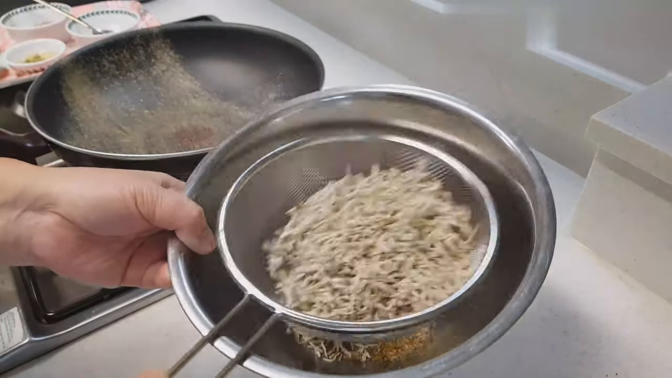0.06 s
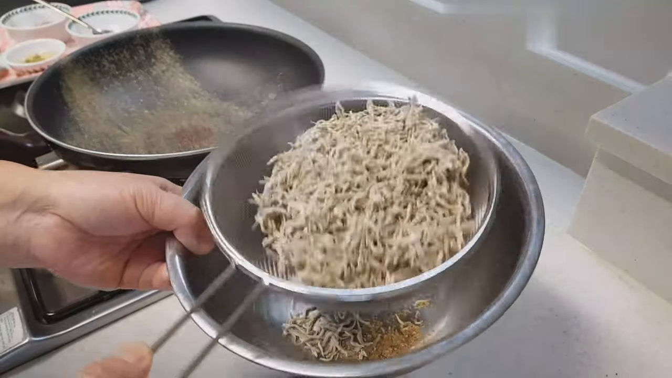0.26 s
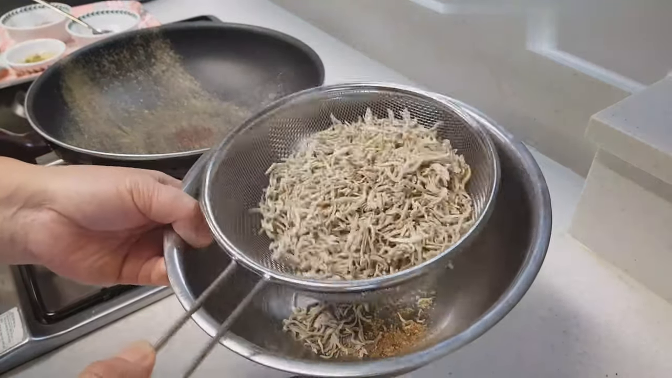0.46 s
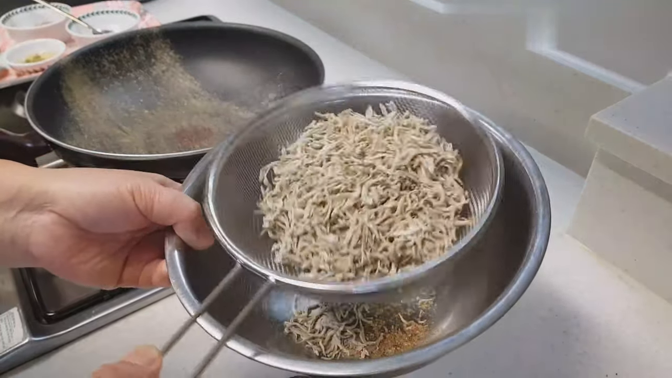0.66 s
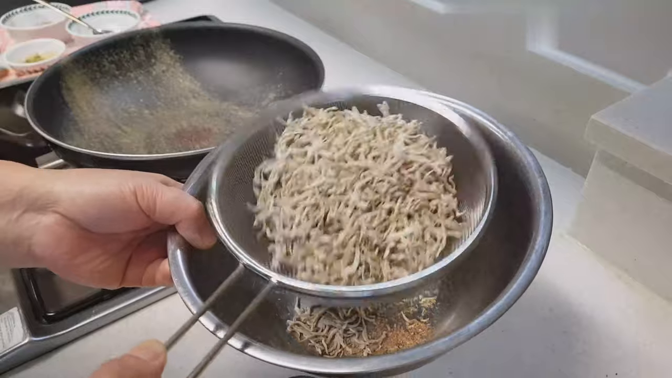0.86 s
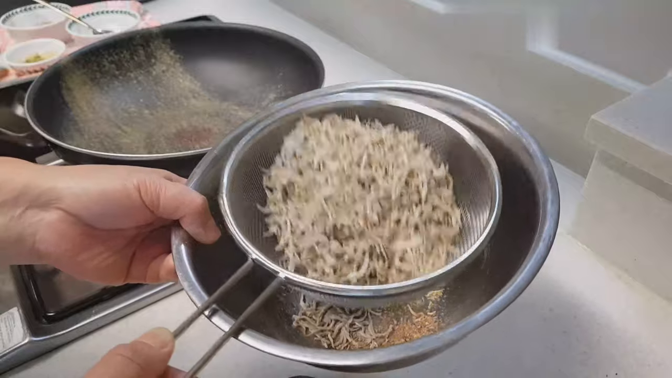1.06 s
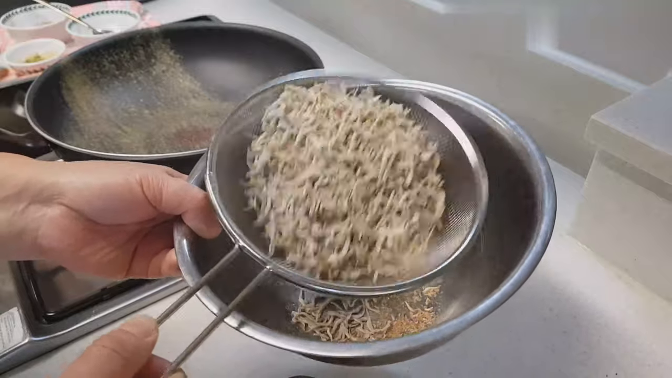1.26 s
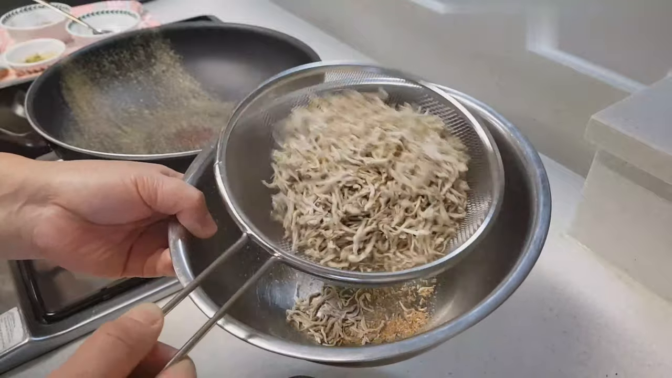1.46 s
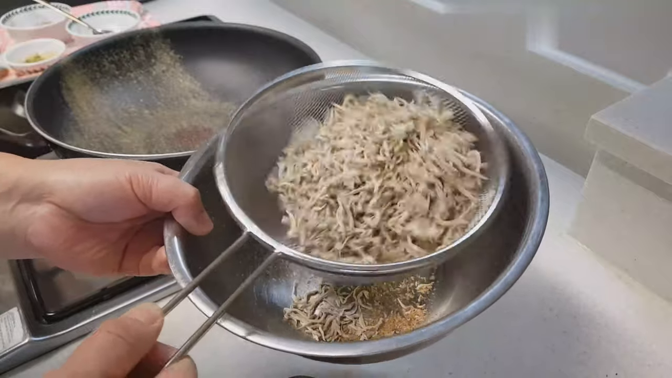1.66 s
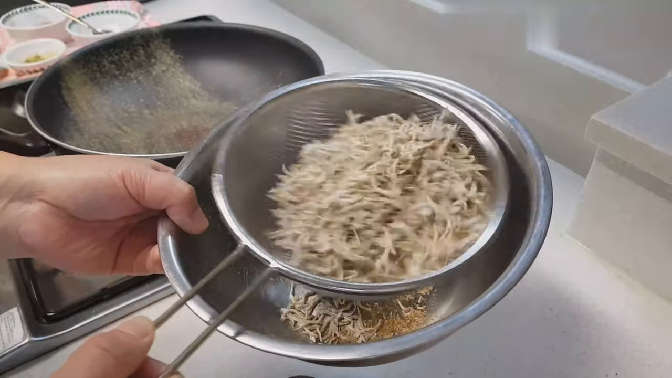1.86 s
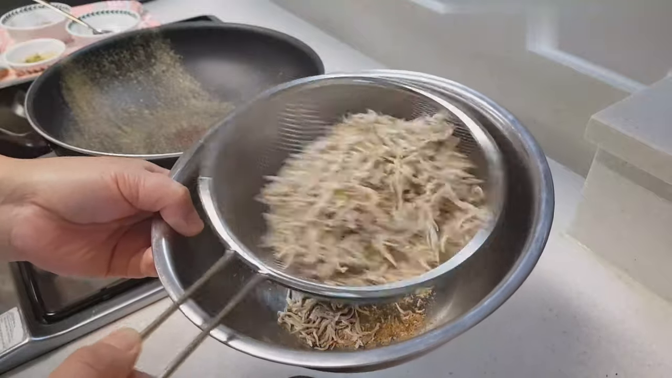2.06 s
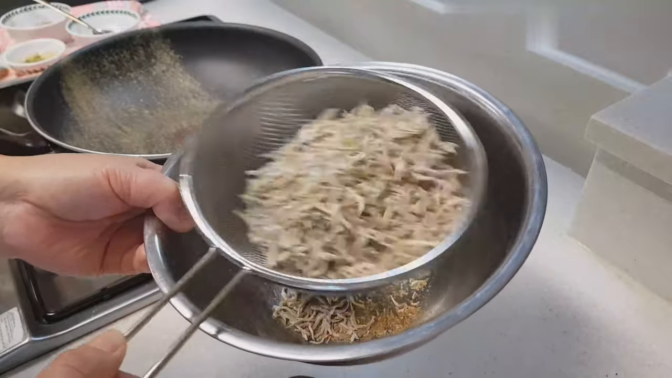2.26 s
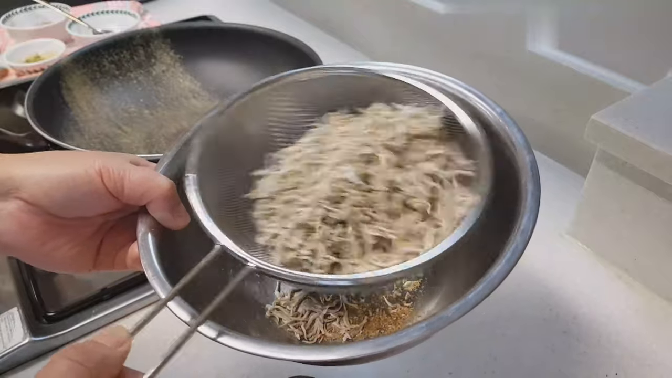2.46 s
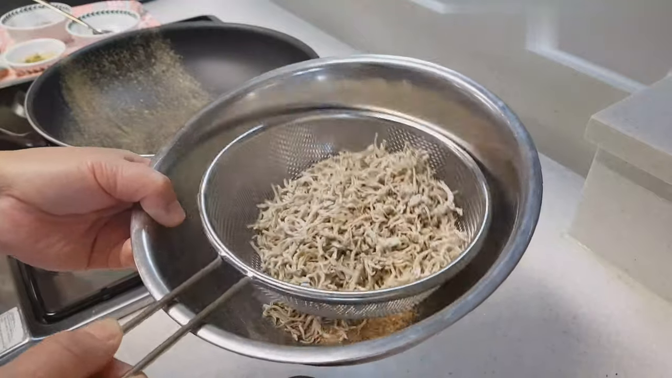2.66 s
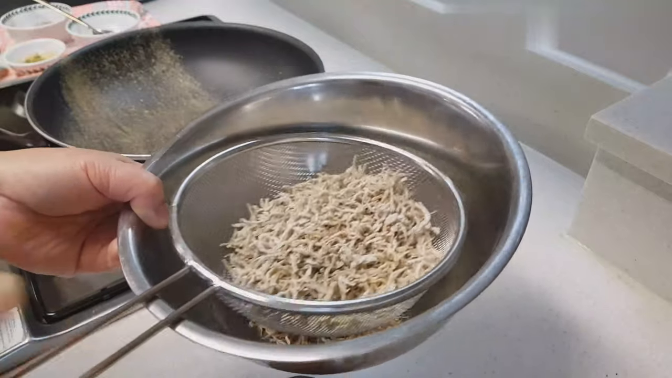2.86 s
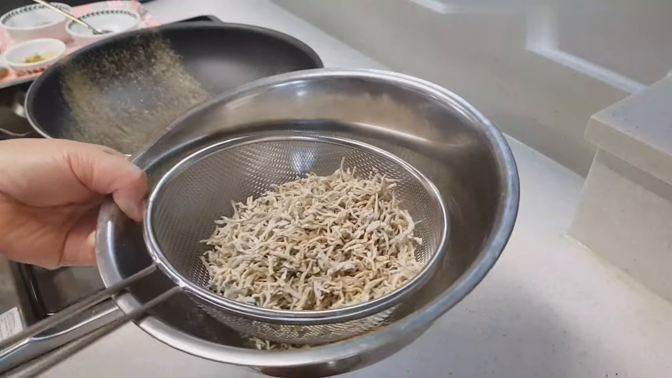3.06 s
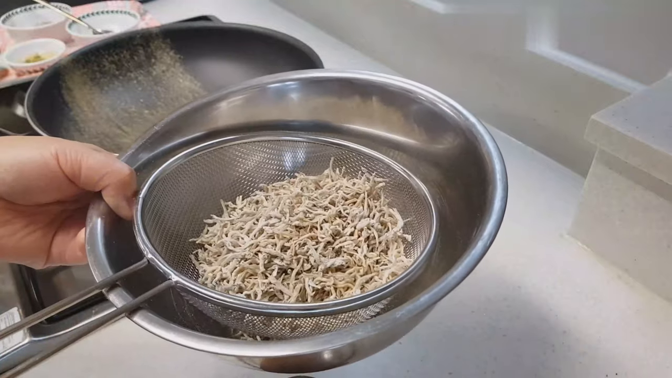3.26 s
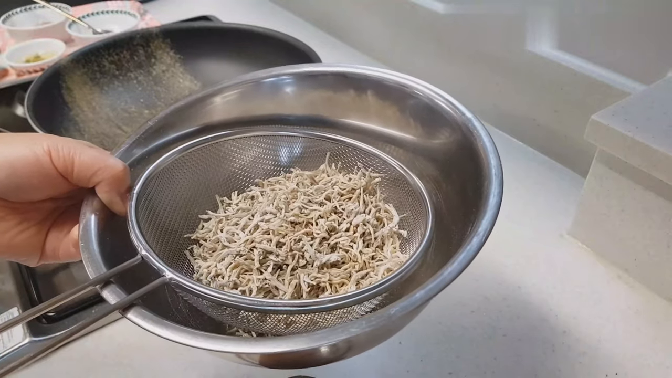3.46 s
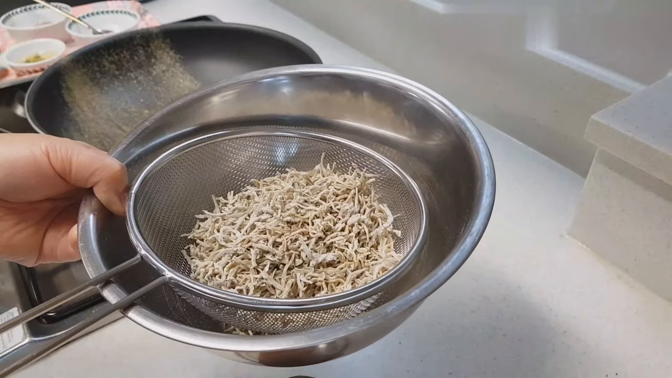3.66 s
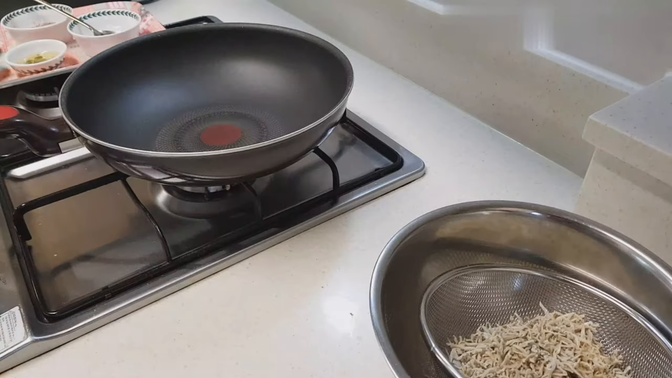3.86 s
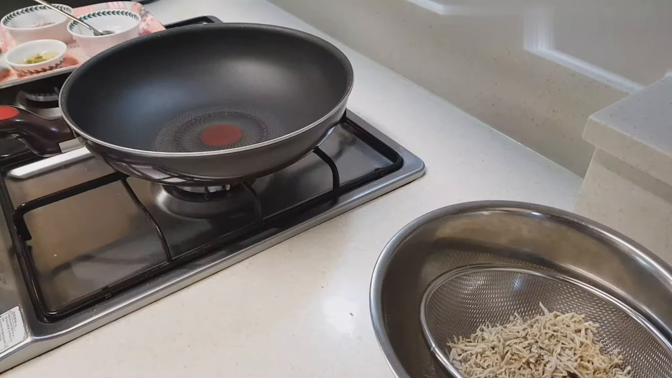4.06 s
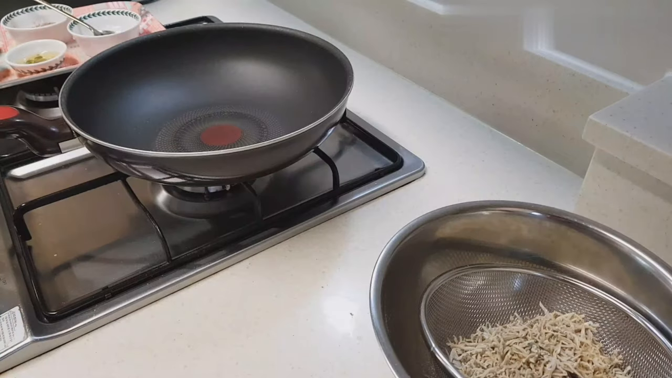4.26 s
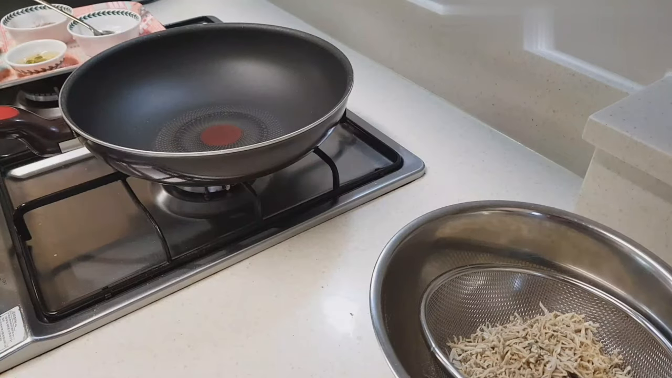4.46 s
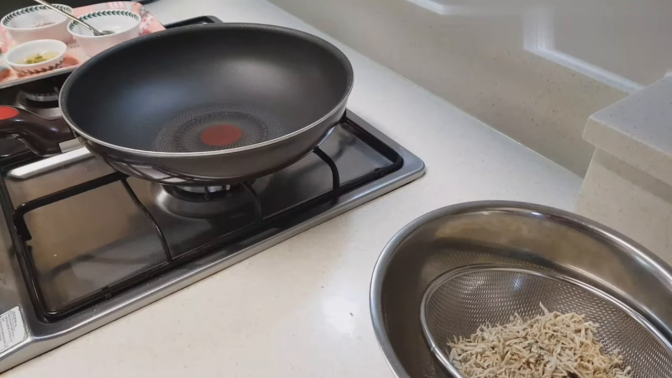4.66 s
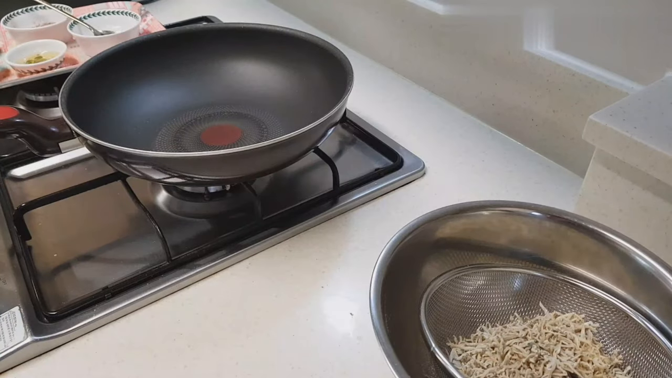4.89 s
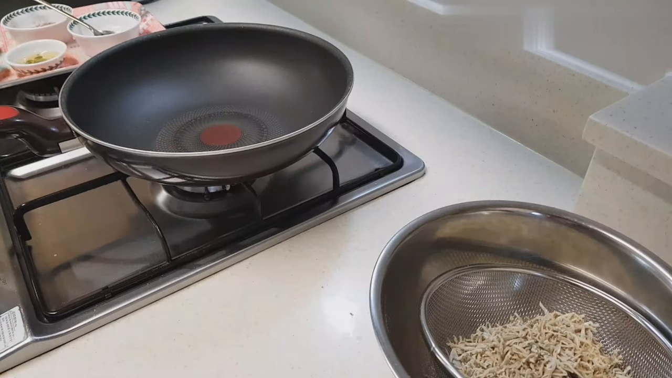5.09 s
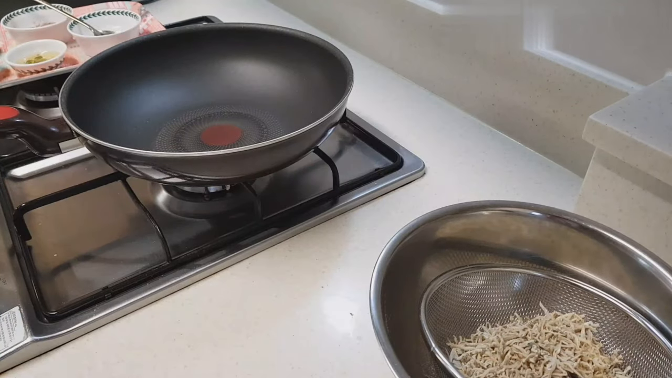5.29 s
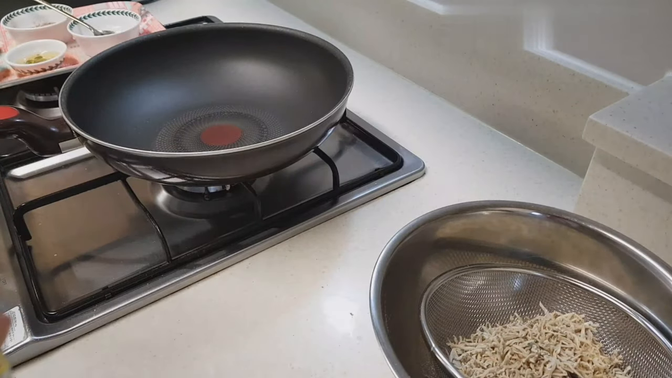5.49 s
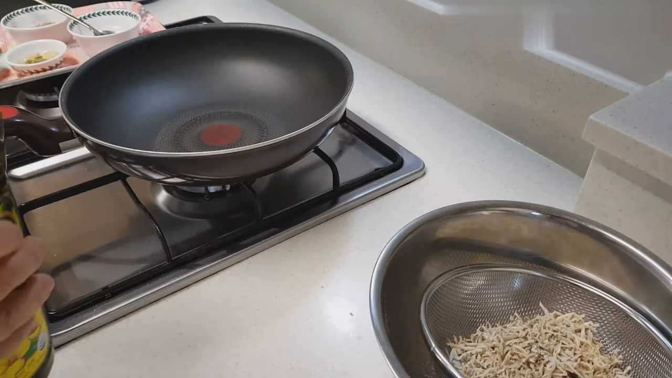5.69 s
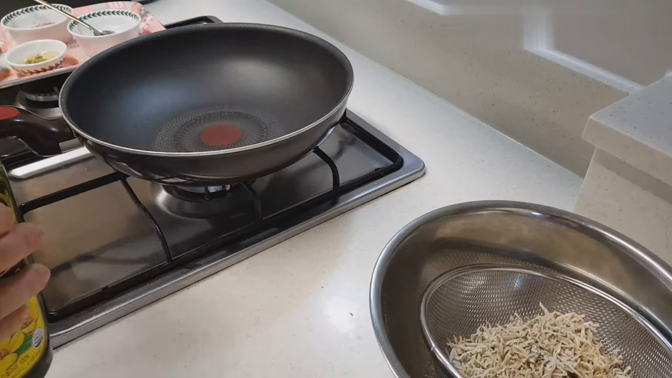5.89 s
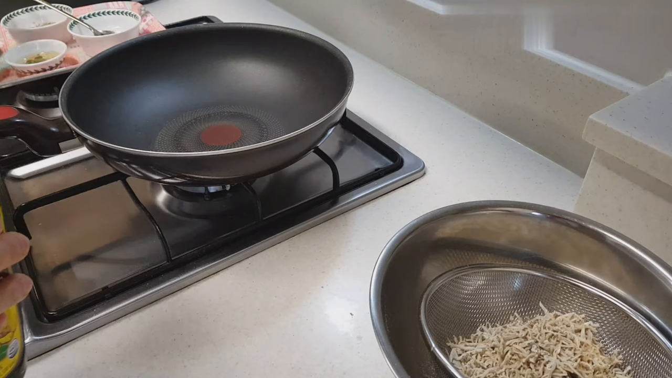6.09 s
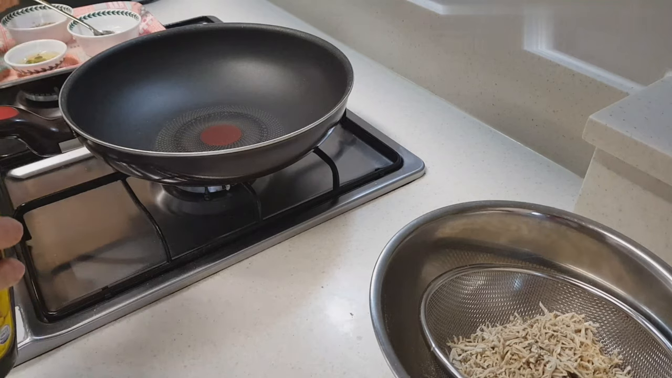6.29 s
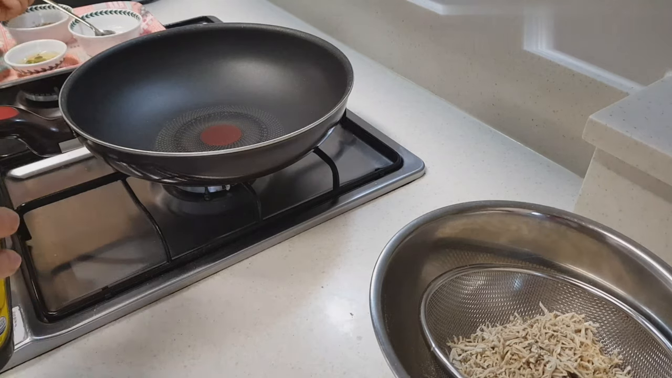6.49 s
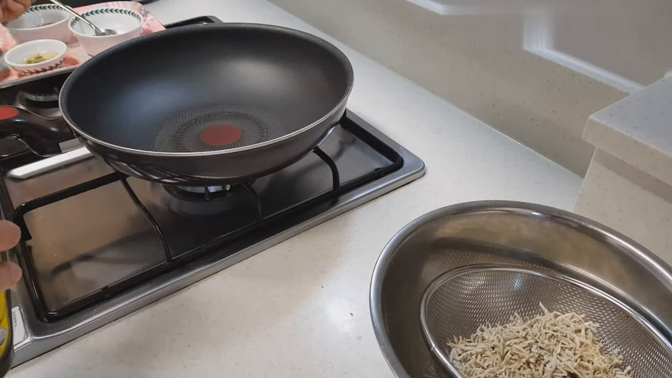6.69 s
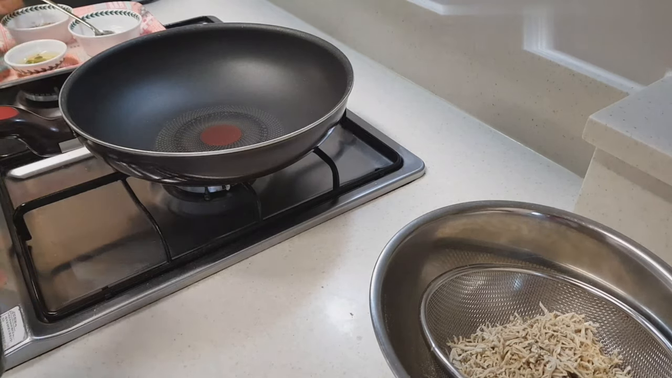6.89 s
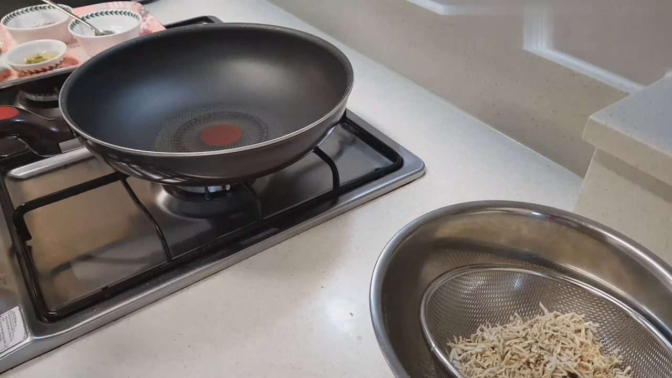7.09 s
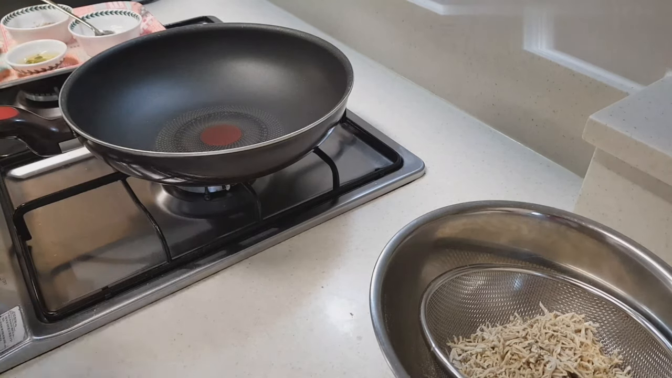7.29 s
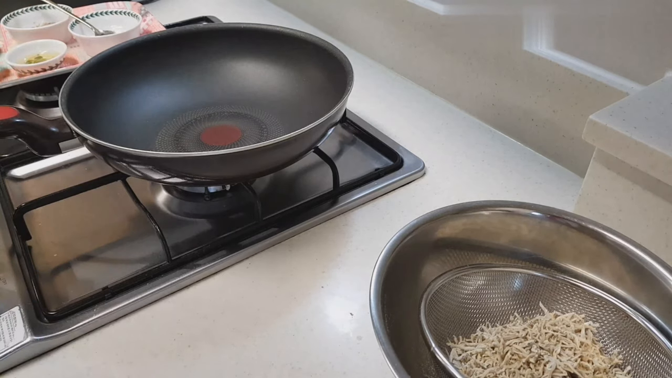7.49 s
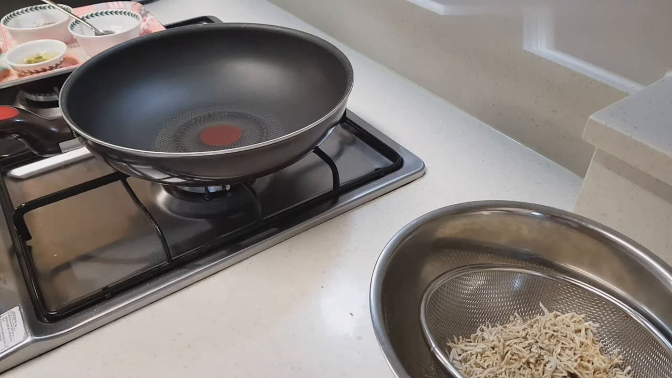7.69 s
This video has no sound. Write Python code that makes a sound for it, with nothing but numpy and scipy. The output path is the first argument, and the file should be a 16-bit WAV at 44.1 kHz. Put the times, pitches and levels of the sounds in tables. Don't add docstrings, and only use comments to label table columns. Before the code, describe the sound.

Dried fish patter in a steel mesh strainer, its rim clinking on a steel bowl, then a plastic bottle snaps open and knocks down over fan drone.

```python
import sys
import numpy as np
from scipy import signal
from scipy.fft import rfft, irfft, next_fast_len
from scipy.io import wavfile

SR = 44100
rng = np.random.default_rng(int(sys.argv[2]) if len(sys.argv) > 2 else 0)


def inscribe(sig):
    pcm = np.round(np.clip(np.atleast_2d(sig).T, -1, 1) * 32767)
    wavfile.write(sys.argv[1], SR, pcm.astype(np.int16))


def nominal_scale(level):
    x = np.asarray(level, float) / 20
    return 10 ** x


N = 341334
STEP = 32
LN_60DB = np.log(1000)


def rms_one(x):
    return x / np.sqrt(np.mean(x ** 2) + 1e-20)


def at_hz(points, hz):
    f, db = np.transpose(points)
    return np.interp(np.log(hz), np.log(f), db)


def bins_hz(size):
    return np.maximum(np.arange(size // 2 + 1) * SR / size, 1)


def seconds(length_s):
    return np.arange(round(length_s * SR)) / SR


def drift(rate_hz):
    r = np.exp(-80 * np.pi * rate_hz / SR)
    noise = rng.standard_normal(N // 40 + 2002)
    slow = signal.lfilter([1], [1, -2 * r, r * r], noise)[2000:]
    return np.interp(np.arange(N) / 40, np.arange(len(slow)), rms_one(slow))


def split(hz, kind, order):
    return signal.butter(order, hz, kind, fs=SR, output="sos")


def colour(x, spectrum, peaks=()):
    length = x.shape[-1]
    size = next_fast_len(length)
    hz = bins_hz(size)
    level_db = at_hz(spectrum, hz)
    for f, width, db in peaks:
        level_db = level_db + db / (1 + (2 * (hz - f) / width) ** 2)
    return rms_one(irfft(rfft(x, size) * nominal_scale(level_db), size)[..., :length])


def lifted(peaks, top_db):
    return [(hz, width, max(db + top_db, 0)) for hz, width, db in peaks]


def pan(db):
    return nominal_scale(np.array([[.5], [-.5]]) * db)


def struck(modes, spread_db, length, scatter=1):
    hz, level_db, t60 = modes
    t = np.arange(length) / SR
    gains = nominal_scale(level_db + spread_db * rng.standard_normal((2, len(hz))))
    phase = scatter * 2 * np.pi * rng.random((2, len(hz)))
    fade = np.exp(-LN_60DB * t / t60[:, None])
    angle = 2 * np.pi * hz[:, None] * t
    sines = (gains * np.cos(phase)) @ (fade * np.sin(angle))
    cosines = (gains * np.sin(phase)) @ (fade * np.cos(angle))
    return sines + cosines


def add(out, sound, s):
    i = round(s * SR)
    out[:, i:i + sound.shape[1]] += sound[:, :N - i]


def stroke(s, rise, length, sag_db, fall):
    t = np.arange(0, N, STEP) / SR - s
    slide = -sag_db * np.minimum(t / length, 1)
    return np.where(t < 0, 20 * t / rise, slide - fall * np.maximum(t - length, 0))


def full(v):
    return np.interp(np.arange(N), np.arange(0, N, STEP), v)


# t/s, level/dB
FAN_AIR = [(0.0, -47.5), (1.5, -48), (2.0, -46.5), (2.4, -44.8), (3.0, -46.2), (3.7, -46.5), (4.1, -44.5),
           (5.2, -44.3), (6.3, -45), (7.74, -44.5)]
# f/Hz, level/dB
AIR_SPECTRUM = [(180, -41), (300, -12.5), (385, -11), (418, -15.5), (447, -8), (527, -4.5), (688, -9),
                (839, -14.5), (1080, -11.5), (1450, -13.5), (1580, -16.5), (1990, -17.5), (6140, -34.5),
                (12900, -43.5), (15800, -47.5)]
# f/Hz, level/dB
RUMBLE_SPECTRUM = [(15, -59), (28, -24.5), (45, -14), (62, -2), (100, -3), (135, 1.5), (195, -9.5),
                   (260, -9), (280, -8)]
# f/Hz, width/Hz, level/dB
DUCT_PEAKS = [(81.5, 31.3, 15), (159.2, 40, 11.5), (244, 52, 10.5), (564, 170, 2.5)]
# f/Hz, likeness/1
EAR_LIKENESS = [(60, 1), (150, 0.94), (380, 0.7), (950, 0.28), (2380, 0.14), (5980, -1.3), (15000, -0.37)]


def fan():
    hum_hz, hum_db, mean_air_db = 120.2, -36.8, -46
    gust_db, side_db = .7, -1.4
    s, level_db = np.transpose(FAN_AIR)
    air_db = np.interp(np.arange(N) / SR, s, level_db)
    hum_db = hum_db + 1.1 * (air_db - mean_air_db)
    size = next_fast_len(N)
    alike = np.clip(at_hz(EAR_LIKENESS, bins_hz(size)), 0, 1)
    mid, side = rfft(rng.standard_normal((2, size)))
    white = irfft(np.sqrt(1 + alike) * mid + np.sqrt(1 - alike) * side * [[1], [-1]], size)[:, :N]
    air = colour(white, RUMBLE_SPECTRUM[:-1] + AIR_SPECTRUM[1:], DUCT_PEAKS)
    air = air * nominal_scale(air_db + 11 + gust_db * drift(8.8))
    hum = np.sqrt(2) * np.sin(2 * np.pi * hum_hz * np.arange(N) / SR + .15 * drift(5.9))
    return (air + hum * nominal_scale(hum_db + 3.35 + 0.45 * drift(5))) * pan(side_db)


def kitchen(x):
    t60_s = 0.22
    t = seconds(.45)
    echoes = rng.standard_normal((2, len(t))) * np.exp(-LN_60DB * t / t60_s) * (t > .004)
    echoes = echoes / np.linalg.norm(echoes, axis=1)[:, None]
    return signal.fftconvolve(x, echoes, axes=1)[:, :N]


# t/s, level/dB, rise/s per 20 dB, stroke length/s
FINGER_RUBS = [(4.242, -64, .2, .03), (4.34, -53, .018, .03), (4.43, -63, .08, .13),
               (4.652, -55, .031, .04), (4.73, -62, .08, .09), (4.826, -48, .013, .008),
               (4.86, -62, .04, .11), (5.088, -57, .2, .08), (5.5, -63, .08, .02), (5.674, -58, .17, .02),
               (5.82, -54, .17, .03), (7.41, -60, .04, .05), (7.52, -53.5, .26, .09), (7.74, -63, .04, .02)]
# f/Hz, level/dB
LABEL_SPECTRUM = [(2350, -30), (4000, -9), (8110, -3), (8840, -12.5), (11600, -3.5), (14900, -8.5),
                  (15800, -20.5)]


def hands():
    grip_db, grip_s = -76, 4.0
    power = nominal_scale(grip_db) ** 2 * (np.arange(0, N, STEP) > grip_s * SR)
    for s, db, rise, length in FINGER_RUBS:
        power = power + nominal_scale(db + stroke(s, rise, length, sag_db=5.5, fall=150)) ** 2
    friction = colour(rng.standard_normal((2, N)), LABEL_SPECTRUM)
    return friction * full(np.sqrt(power)) * nominal_scale(-2.5 + 1.5 * drift(30))


def plastic_hits(hits, spectrum, peaks, t60):
    out, t = np.zeros((2, N)), seconds(.3)
    decay = LN_60DB / t60
    for s, peak_db, tilt_db, scrape, side_db in hits:
        shape = [(hz, db + tilt_db * np.log2(hz / 2000)) for hz, db in spectrum]
        noise = rng.standard_normal((3, len(t)))
        noise = colour(noise[:2] + 0.27 * noise[2], shape, lifted(peaks, top_db=3))
        low = signal.sosfilt(split(2500, "low", 2), noise)
        late = np.maximum(t - scrape, 0) * decay
        during = np.minimum(t, scrape) * decay
        tail = low * np.exp(-late) + (noise - low) * np.exp(-.85 * late - .35 * during)
        onset = np.minimum(t / (.0008 + .2 * scrape), 1)
        crack = onset * (1 + 2.6 * np.exp(-scrape / 0.0094 - t / 0.0023))
        add(out, nominal_scale(peak_db - 8) * pan(side_db) * crack * tail, s)
    return out


# t/s, level/dB, tilt/dB per octave, scrape length/s, left-right/dB
CAP_KNOCKS = [
    (4.334, -41, 1.2, 0.004, 3),
    (4.505, -43, 2.5, 0.004, 5),
    (4.652, -45, 0.1, 0.004, 7),
    (4.824, -48, 3, 0.004, 7),
    (5.3465, -10, 0.1, 0.0026, 1),
    (7.417, -47, 0.1, 0.004, -2.0),
]
# f/Hz, level/dB
PLASTIC_SPECTRUM = [(150, -35), (250, -5.5), (786, 0), (951, -4), (1520, -2.5), (1810, -3), (2430, -4.5),
                    (3880, -18), (4150, -13.5), (9550, -14.5), (15800, -20.5)]
# f/Hz, width/Hz, level/dB
BOTTLE_PEAKS = [(740, 260, .5), (1140, 70, 2.5), (1720, 400, 3.5), (2400, 90, 2.5), (2760, 36, -10),
                (3120, 30, 1.5), (4150, 65, .1)]


def bottle_knocks():
    return plastic_hits(CAP_KNOCKS, PLASTIC_SPECTRUM, BOTTLE_PEAKS, t60=.13)


# t/s, level/dB, tilt/dB per octave, scrape length/s, left-right/dB
BOTTLE_LANDINGS = [
    (6.526, -29.5, .3, 0.0091, 2),
    (6.8198, -13.8, 2.3, 0.032, 0),
    (6.8713, -18.5, .3, 0.02, -0.5),
]
# f/Hz, level/dB
COUNTER_SPECTRUM = [(150, -47), (250, -21), (518, -10), (708, -1), (918, -6.5), (1520, -8.5), (1870, -13),
                    (2190, -10), (2940, -18.5), (11000, -33), (15800, -45)]
# f/Hz, width/Hz, level/dB
COUNTER_RESONANCES = [(686, 59, -7), (1066, 27, -2), (1490, 110, 2), (2220, 30, -16), (2680, 36, -12),
                      (3080, 36, -17)]


def bottle_set_down():
    return plastic_hits(BOTTLE_LANDINGS, COUNTER_SPECTRUM, COUNTER_RESONANCES, t60=.105)


# t/s, level/dB, ring t60/s, left-right/dB
LIGHT_TOUCHES = [(0.7103, -32, 0.14, -0.5), (0.3535, -44, .08, -1.5), (0.843, -31.5, 0.068, -2.0),
                 (0.8904, -42.5, 0.1, -0.5), (1.5784, -34.5, 0.077, -2.0), (2.1281, -44, 0.1, 0.5),
                 (2.333, -34.5, 0.11, 0), (2.3979, -40, 0.1, -1.5),
                 (2.6605, -23.5, .08, -2.5),
    (6.8735, -32, .035, 0),
]
# f/Hz, level/dB
TOUCH_SPECTRUM = [(2350, -43.5), (4000, -19.5), (5030, -4.5), (6560, -23), (8110, 2.5), (9050, -11),
                  (13500, -4), (15800, -16.5)]


def ticks():
    out, t = np.zeros((2, N)), seconds(.2)
    for s, peak_db, t60, side_db in LIGHT_TOUCHES:
        fade = np.exp(-t / 0.0081) + np.exp(-LN_60DB * t / t60)
        hiss = colour(rng.standard_normal((2, len(t))), TOUCH_SPECTRUM)
        add(out, nominal_scale(peak_db - 11) * pan(side_db) * fade * hiss, s)
    return out


# f/Hz, level/dB, t60/s
SEATED_BOWL = [(612, -7, .14), (655, -10, .1), (1776, -19, .09), (2568, -19, .1), (3305, -24, .12)]


def landing():
    s, peak_db, hz, swell_s = 2.7165, -11, 590, .0022
    out, t = np.zeros((2, N)), seconds(.3)
    push = (t / swell_s / 2) ** 2 * np.exp(2 - t / swell_s) * np.sin(2 * np.pi * hz * t)
    ring = struck(np.transpose(SEATED_BOWL), spread_db=1.0, length=len(t), scatter=.2)
    add(out, nominal_scale(peak_db) * (push + nominal_scale(-6) * ring * np.minimum(t / .006, 1)), s)
    return out


# t/s, level/dB, bowl thump/dB, ring t60/s, left-right/dB
RIM_CLINKS = [
    (0.1452, -33, -15, 0.068, -0.5),
    (1.1378, -9, -9, 0.068, -4),
    (1.8811, -26, -14, 0.1, -2),
    (2.4575, -9.5, -17, 0.067, -0.5),
    (2.6693, -3.5, -9, 0.07, -3),
    (2.7172, -23, -.1, 0.13, 3),
    (2.796, -34, -14, 0.081, 1),
    (2.8978, -26.5, -3.5, 0.093, 0),
    (2.9602, -21.5, -3, 0.054, -2),
]
# f/Hz, level/dB
RIM_SPECTRUM = [(530, -37), (900, -4), (1450, -5.5), (1870, -15.5), (2700, -12), (3500, -4.5), (4490, -4),
                (6280, -5.5), (8070, 0.5), (11800, -6), (15800, -12.5)]
# f/Hz, width/Hz, level/dB
RIM_RESONANCES = [(2560, 23, -9), (4080, 160, -2), (4420, 52, -5), (4640, 89, -5.5), (5530, 20, -4.5),
                  (7360, 110, 1), (8310, 61, 4), (8710, 32, -6), (10300, 57, -8), (10500, 44, -2),
                  (11700, 48, -4.5), (11800, 43, -6.5), (11700, 38, -5), (13500, 66, -11.5)]
# f/Hz, level/dB, t60/s
WIRE_MODES = [(2570, -23, 0.35), (3435, -12, 0.3), (3860, -7, 0.076), (7350, -1.5, 0.087), (7300, -7, .12),
              (7980, -2, 0.26)]
# f/Hz, level/dB, t60/s
BOWL_MODES = [(588, 2, .02), (545, 0, .085), (755, -4, .04), (900, -6, .03), (1253, -8, .04),
              (2560, -21, .1), (3435, -14, .04)]


def clinks():
    slide_s, bend_s = .0022, .0022
    out, t = np.zeros((2, N)), seconds(.3)
    length = len(t)
    wire_hz, wire_db, wire_t60 = np.transpose(WIRE_MODES)
    middle, top = split(3000, "low", 4), split(3000, "high", 4)
    for s, peak_db, bowl_db, t60, side_db in RIM_CLINKS:
        noise = rng.standard_normal((3, length))
        clatter = colour(noise[:2] + .5 * noise[2], RIM_SPECTRUM, lifted(RIM_RESONANCES, top_db=6.5))
        clatter = clatter * (0.41 * np.exp(-t / 0.0033) + np.exp(-LN_60DB * t / t60))
        modes = wire_hz, wire_db - 11, wire_t60 * t60 / 0.48
        ring = clatter + struck(modes, spread_db=4.5, length=length)
        middle_gain = nominal_scale(-15.5 - .32 * peak_db + 12.5)
        ring = middle_gain * signal.sosfilt(middle, ring) + signal.sosfilt(top, ring)
        ring = ring * np.minimum(t / slide_s, 1) * nominal_scale(-9)
        thump = struck(np.transpose(BOWL_MODES), spread_db=1.5, length=length, scatter=0.11)
        thump = (thump[0] + 0.15 * thump) * np.minimum(t / bend_s, 1)
        add(out, nominal_scale(peak_db) * (ring * pan(side_db) + nominal_scale(bowl_db - 5.5) * thump), s)
    return out


# t/s, level/dB, rise/s per 20 dB, slide length/s, brightness/dB
TOSSES = [(0.003, -45, .011, .012, -6), (0.075, -54, .06, .09, -2), (0.376, -37, .016, .035, .1),
          (0.6, -48, .065, .025, .9), (0.79, -41, .05, .05, 4.5), (0.975, -41.5, .028, .05, 4),
          (1.35, -39.5, .013, .05, .1), (1.516, -49, .05, .14, -2), (1.712, -49, .044, .13, .1),
          (2.0, -50, .25, .02, -2), (2.098, -47, .052, .12, -3), (2.31, -44, .088, .055, 5),
          (2.4, -53, .06, .05, -3), (2.55, -48, .06, .07, .5), (2.79, -53, .06, .04, -2),
          (2.89, -54.5, .18, .05, .1), (2.985, -52.5, .06, .012, -.9)]


def tossing():
    power, bright = 1e-9, 0
    for s, db, rise, length, bright_db in TOSSES:
        throw = nominal_scale(db + stroke(s, rise, length, sag_db=6.5, fall=380)) ** 2
        crumbs = nominal_scale(db - 25 + stroke(s, rise, length, sag_db=0, fall=48)) ** 2
        power = power + throw + crumbs
        bright = bright + throw * bright_db
    return full(10 * np.log10(power)), full(bright / power)


# f/Hz, level/dB
MESH_SPECTRUM = [(1470, -33.5), (2500, -12.5), (2990, -12.5), (3970, -8.5), (4290, -10), (6560, -3),
                 (10000, -7.5), (12200, -4.5), (14900, -13.5), (15800, -24)]
# f/Hz, width/Hz, level/dB
MESH_RESONANCES = [(6600, 350, 1.2), (7900, 700, -0.5), (11800, 900, -4)]


def fish():
    level_db, bright_db = tossing()
    per_s = 6500 * nominal_scale(0.43 * (level_db + 47.5) + 1.7 * drift(60))
    sizes = nominal_scale(3.5 * np.minimum(rng.exponential(1, (3, N)), 4)) * rng.choice([-1, 1], (3, N))
    taps = (rng.random((3, N)) < per_s / SR) * sizes / np.sqrt(per_s) + 1e-18
    edges_hz = np.linspace(1500, 16500, 9)
    patch = rng.integers(0, 8, (3, N))
    rung = 0
    for k in range(8):
        rung = rung + signal.sosfilt(split(edges_hz[k:k + 2], "band", 2), taps * (patch == k))
    rung = colour(rung[:2] + 0.24 * rung[2], MESH_SPECTRUM, lifted(MESH_RESONANCES, top_db=5))
    top = signal.sosfilt(split(9000, "high", 2), rung)
    patter = rung + (nominal_scale(bright_db) - 1) * top
    return patter * nominal_scale(level_db + 1.06 + 1.1 * drift(45)) * pan(-1.5)


def scene():
    rustle = fish() + ticks()
    hits = clinks() + landing() + bottle_knocks() + bottle_set_down()
    room = nominal_scale(-5) * kitchen(hits + nominal_scale(-4.5) * rustle)
    return rustle + hits + room + hands() + fan()


def top_cut(x):
    return signal.sosfilt(signal.butter(12, 16480, fs=SR, output="sos"), x)


def record(dry):
    cut_s, back_s, fade_s = 3.7832, 4.019, .018
    t = np.arange(N) / SR
    gate = np.where(t < cut_s, 1, np.clip((t - back_s) / fade_s, 0, 1) ** 2)
    mic_top = signal.ellip(8, 1, 45, 15550, fs=SR, output="sos")
    return top_cut(signal.sosfilt(mic_top, dry) * gate)


dry = scene()
out = record(dry)
inscribe(out)
```